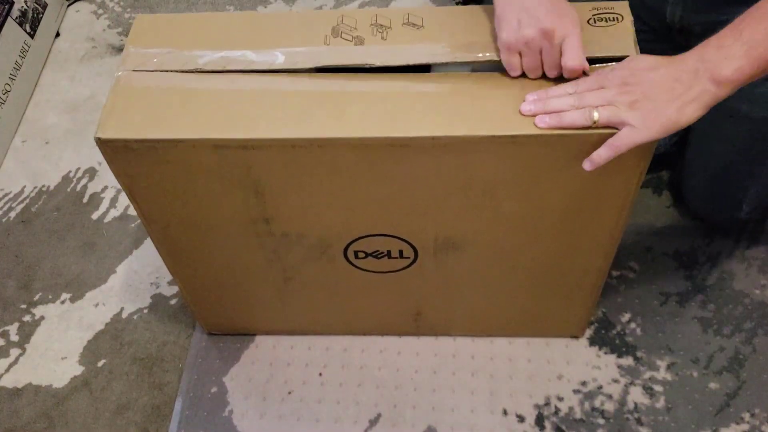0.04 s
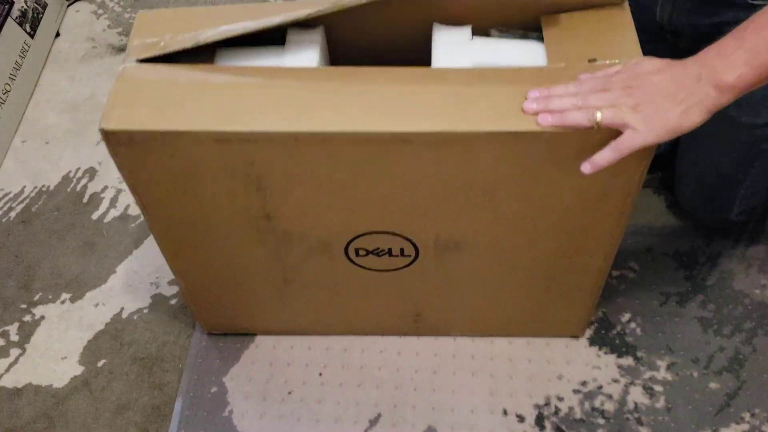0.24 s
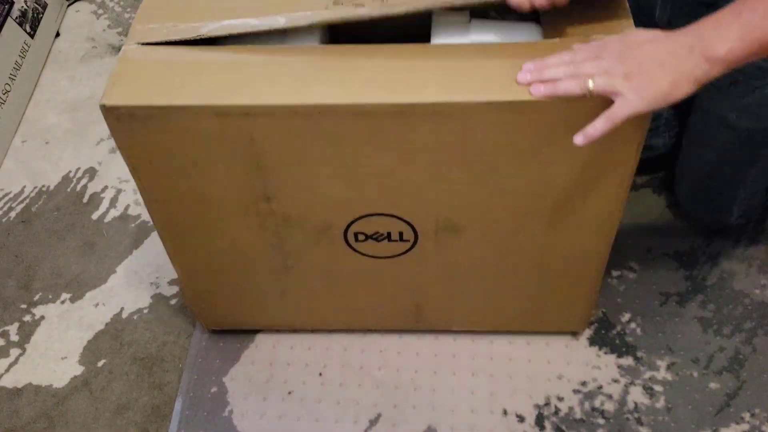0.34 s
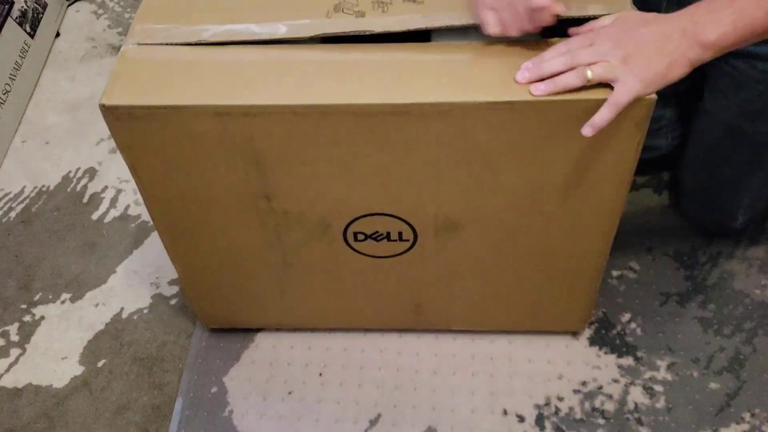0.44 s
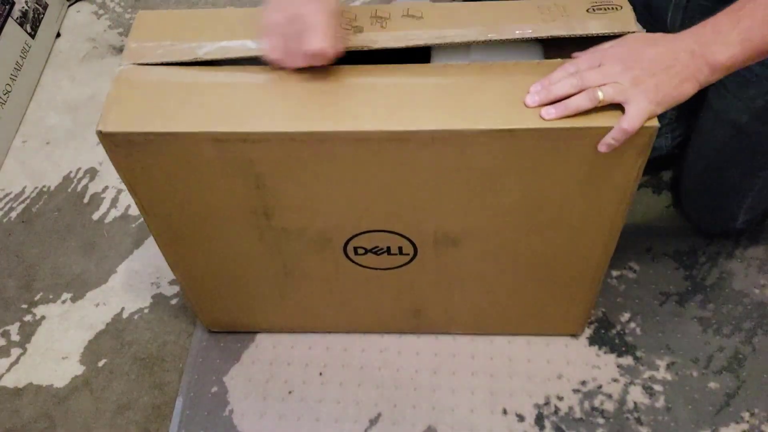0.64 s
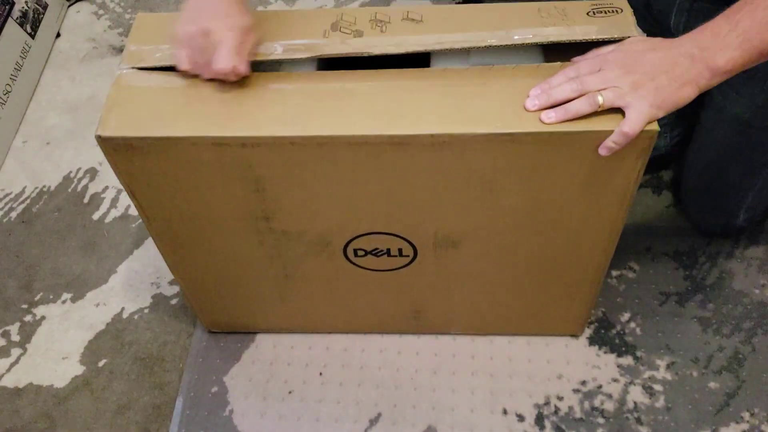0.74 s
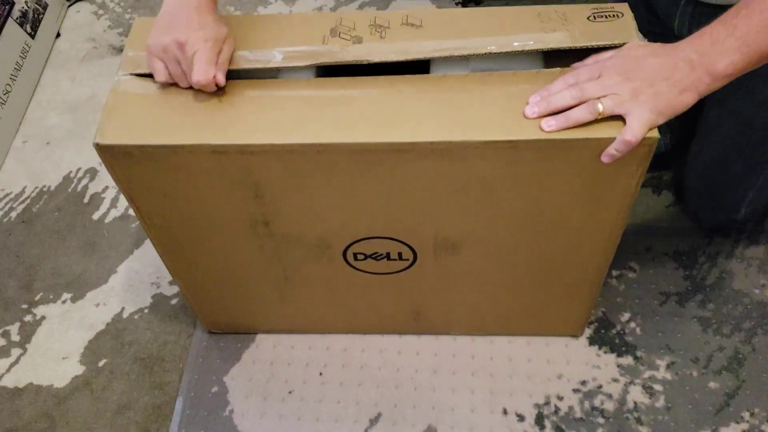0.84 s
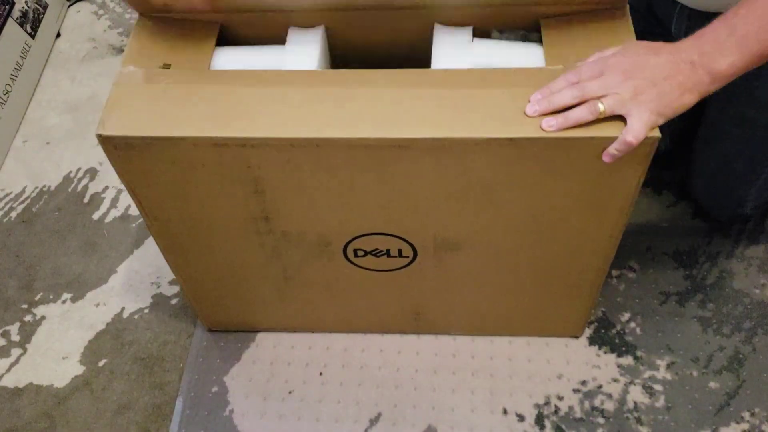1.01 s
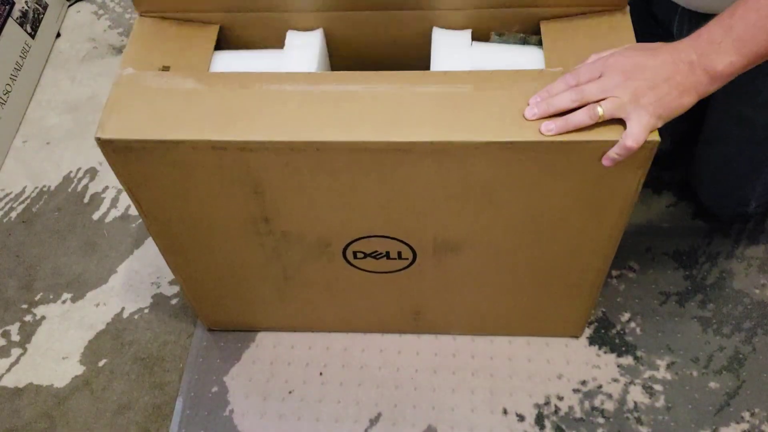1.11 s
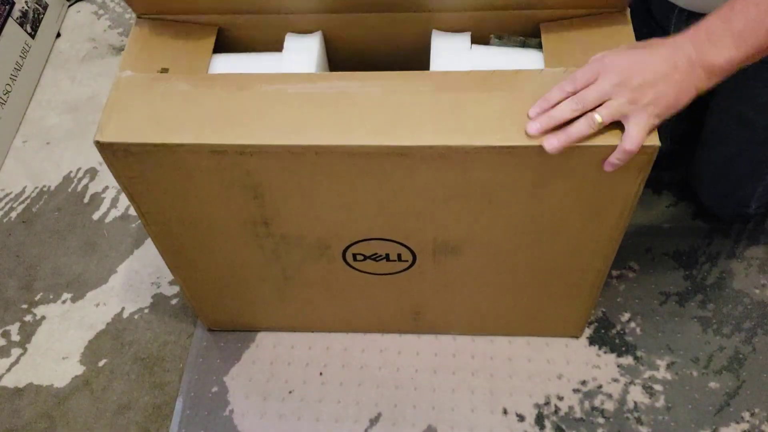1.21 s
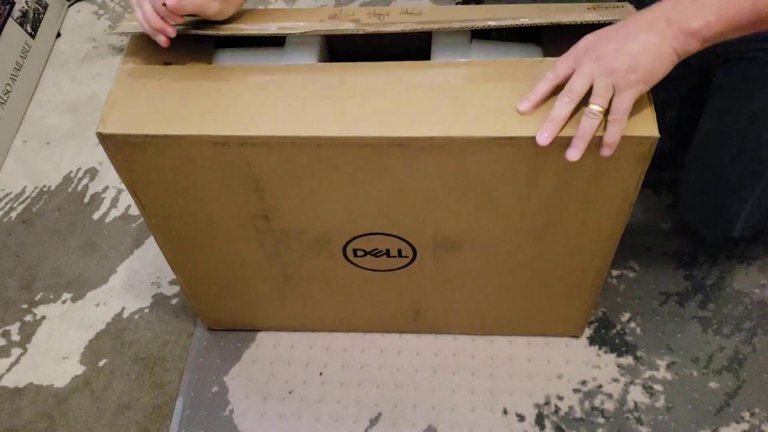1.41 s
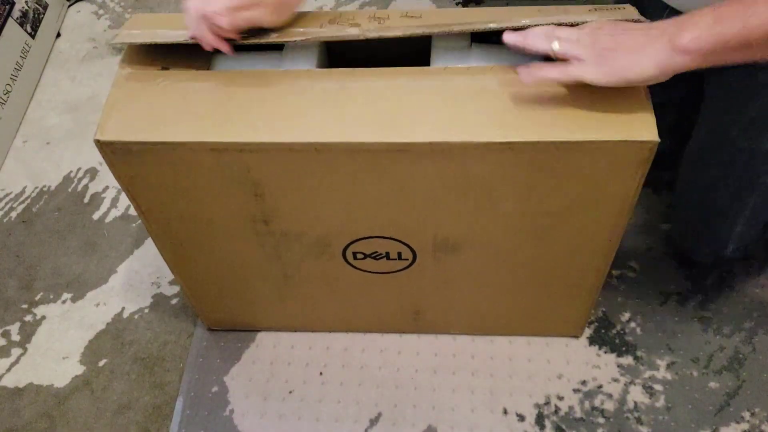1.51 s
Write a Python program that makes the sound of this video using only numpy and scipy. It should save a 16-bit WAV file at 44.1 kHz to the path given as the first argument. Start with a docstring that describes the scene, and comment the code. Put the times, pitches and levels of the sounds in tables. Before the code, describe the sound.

Cardboard box flap ripped open in two tugs, with hollow thumps and scraping.

```python
"""The taped flap of a big cardboard box is tugged open in a hard-walled room.
First a hand slides and bumps on the card while the flap scrapes, squeaks at its fold and ticks.
A tug rasps, then one end rips free with a pop; the flap knocks and the hollow box booms.
The palm drags over the box. Near one second a second tug rasps and creaks, and the other end rips free.
Last, the loose flap rattles, scrapes and creaks once more."""
import sys
import numpy as np
from scipy import signal
from scipy.fft import rfft, irfft
from scipy.io import wavfile

SR = 44100
rng = np.random.default_rng(int(sys.argv[2]) if len(sys.argv) > 2 else 0)


def wav_record(signal):
    """Record a signal, one row per channel, as 16-bit PCM in the file named by sys.argv[1]."""
    frames = np.transpose(np.atleast_2d(signal))
    bounded = np.clip(frames, -1, 1)
    # unit amplitude maps onto the largest positive 16-bit level
    quanta = np.round(bounded * 32767).astype(np.int16)
    wavfile.write(sys.argv[1], SR, quanta)


N = 68355
WIDE_HZ = 823  # above this pitch the two ears hear clearly different sound


def undb(db):
    """Turn decibels into a number to multiply by."""
    return 10 ** (np.asarray(db) / 20)


def unit(x):
    """Scale a sound to an average power of 1."""
    return x / np.sqrt(np.mean(x ** 2) + 1e-18)


def since(start):
    """Seconds since start, zero before it."""
    return np.maximum(np.arange(N) / SR - start, 0)


def fade(start, decay_s):
    """Start suddenly, then die away."""
    return (since(start) > 0) * np.exp(-since(start) / decay_s)


def convolve(x, response):
    """Pass a sound through one echo pattern per channel."""
    return signal.fftconvolve(np.atleast_2d(x), np.atleast_2d(response), axes=-1)[:, :N]


def colour(x, points, size=4096):
    """Shape the bass and treble along a curve of (f/Hz, level/dB) points."""
    hz, db = np.array(points).T
    gain = undb(np.interp(np.log(np.fft.rfftfreq(size, 1 / SR) + 1), np.log(hz), db))
    cepstrum = irfft(np.log(unit(gain)))
    cepstrum[1:size // 2] *= 2  # folded so that the filter never rings ahead of the sound
    cepstrum[size // 2 + 1:] = 0
    return convolve(x, irfft(np.exp(rfft(cepstrum))))


def resonate(x, hz, width_hz):
    """Keep the part of a sound near one pitch."""
    return signal.lfilter(*signal.iirpeak(hz, hz / width_hz, fs=SR), x)


def grains(per_s, spread_db, hiss):
    """Tiny fibre snaps of uneven size over a smooth hiss."""
    snaps = (rng.random(N) < per_s / SR) * rng.choice([-1, 1], N)
    sizes = undb(spread_db * np.clip(rng.standard_normal(N), -2, 2))
    return unit(unit(snaps * sizes) + hiss * rng.standard_normal(N))


def stroke(start, length, rise_s=0.00053, release_s=0.022):
    """The force of one rub rises, holds and lets go."""
    return (1 - np.exp(-since(start) / rise_s)) * np.exp(-since(start + length) / release_s)


def rubs(table, points):
    """Surfaces stick and slip in short, grainy bursts."""
    force = sum(undb(db) * stroke(start, length) for start, length, db in table)
    return colour(force * grains(per_s=2200, spread_db=-2, hiss=0.87), points)


def ring(start, rise_s, hz, ring_s, flutter_db=1, flutter_s=0.0181):
    """One note of the box swells, then fades by 60 dB in ring_s; loose panels make it waver."""
    t = since(start)
    phase = 2 * np.pi * rng.random()
    ear_shift = np.array([[1], [-1]]) * rng.choice([-1, 1]) * np.arctan(hz / WIDE_HZ) / 2
    steps = rng.standard_normal(size=128)
    flutter = undb(flutter_db * np.interp(t / flutter_s, np.arange(len(steps)), steps))
    loudness = flutter * (1 - np.exp(-t / rise_s)) * np.exp(-np.log(1000) * t / ring_s)
    return loudness * np.sin(2 * np.pi * hz * t + phase + ear_shift)


# tone of the quiet room: f/Hz, level/dB
BACKGROUND_TONE = [(30, -20.5), (90, 3), (180, -7.5), (500, -12), (2000, -7), (7000, -28), (15500, -38)]
def background(level_db=-72.5):
    """A faint, steady hush, different in each ear."""
    return undb(level_db) * colour(rng.standard_normal((2, N)), BACKGROUND_TONE)


# how loud the sliding hand is over time: t/s, level/dB
SLIDE_LEVELS = [(0, -47), (0.051, -41.5), (.15, -57.5), (0.357, -50), (0.375, -37), (.43, -43.5),
                (.51, -47), (.58, -44), (0.739, -44.5), (.83, -50), (.93, -59.5), (1.23, -56), (1.29, -52),
                (1.34, -54), (1.39, -53), (1.471, -56), (1.55, -42.5)]
# tone of skin on card: f/Hz, level/dB
SLIDE_TONE = [(100, -15), (300, -4.5), (700, -7.5), (1200, -17), (3000, -14), (3800, -14), (7500, -11),
              (9000, -13.5), (12500, -13.5), (15500, -21.5)]
def slide():
    """Skin brushes along the card with a fine-grained hiss."""
    force = undb(np.interp(since(0), *np.array(SLIDE_LEVELS).T))
    return colour(force * grains(per_s=2500, spread_db=2, hiss=0.58), SLIDE_TONE)


# scrapes of the flap: t/s, length/s, level/dB
FLAP_SCRAPES = [(0, 0.034, -42.5), (.025, 0.093, -50.5), (.405, 0.0083, -47), (1.262, 0.028, -46),
                (1.365, 0.039, -48.5), (1.512, 0.045, -41.5)]
# tone of a scrape: f/Hz, level/dB
SCRAPE_TONE = [(35, -102), (60, -45.5), (159, 4.5), (613, 8), (1020, -6.5), (1520, -1), (2360, -9.5),
               (4120, -32), (6120, -56.5), (7370, -2), (8280, -67), (12900, -34), (15500, -75.5)]
def scrapes():
    """The loose flap sticks and slips as it moves."""
    return rubs(FLAP_SCRAPES, SCRAPE_TONE)


# soft bumps of hand and flap: t/s, rise/s, level/dB, f/Hz around which the box rings most
SOFT_BUMPS = [(0, 0.0024, -32.5, 221), (0.033, 0.017, -28.5, 178), (0.386, 0.0084, -38.5, 130),
              (0.497, 0.0086, -36, 156), (.53, 0.015, -35, 377), (0.561, 0.016, -27, 187),
              (0.69, 0.065, -30, 131), (0.724, 0.0038, -44.5, 363), (1.011, 0.01, -36, 200),
              (1.293, 0.033, -31.5, 230), (1.375, 0.0033, -36.5, 212), (1.396, 0.0051, -31, 116),
              (1.509, 0.0047, -36.5, 162)]
def bumps(count=8, spread_octaves=0.5, ring_share=0.62):
    """Soft touches stir the lowest notes of the box (see boom) while the hand cuts them short."""
    out, notes_hz = 0, np.array(BOX_NOTES)[:count, 0]
    for start, rise_s, db, centre_hz in SOFT_BUMPS:
        share = 1 / (1 + (np.log2(notes_hz / centre_hz) / spread_octaves) ** 2)
        for gain, (hz, ring_s, *_) in zip(share / np.linalg.norm(share), BOX_NOTES):
            out = out + undb(db) * gain * ring(start, rise_s, hz, ring_s * ring_share)
    return out


# moments when the fold gives: t/s, level/dB
FOLD_SQUEAKS = [(0.0137, -33.5), (0.0246, -37.5)]
# notes of the fold: f/Hz, ring time/s, level/dB
FOLD_NOTES = [(1360, .04, -2), (1630, 0.071, -2), (1756, 0.03, 1.5)]
def folds(rise_s=0.001):
    """The fold of the flap gives twice as it is lifted, with a short squeaky ring."""
    return sum(undb(db + note_db) * ring(start, rise_s, hz, ring_s)
               for start, db in FOLD_SQUEAKS for hz, ring_s, note_db in FOLD_NOTES)


# little snaps: t/s, level/dB, f/Hz, fade time/s
CREASE_TICKS = [(0.026, -35, 4860, 0.0016), (0.1882, -28.5, 13200, 0.0014), (0.193, -29, 10800, .002),
                (0.232, -18.5, 7800, 0.0022), (0.2334, -14, 1290, 0.0015), (0.418, -36, 1730, 0.0019),
                (0.468, -37, 6400, 0.0024), (0.9821, -36.5, 6270, 0.0037), (1.0005, -24.5, 5820, 0.0017),
                (1.06, -20.5, 12200, 0.0012), (1.0605, -19.5, 6560, 0.0012), (1.0605, -14, 2090, 0.0011),
                (1.068, -23, 12000, 0.0012), (1.377, -37.5, 7200, 0.0022), (1.42, -42.5, 6000, .0015)]
def ticks(width_share=0.45):
    """Single creases snap in the card and the tape, each a tiny burst of noise around one pitch."""
    out = 0
    for start, db, hz, decay_s in CREASE_TICKS:
        force = fade(start, decay_s)
        burst = force * rng.standard_normal(N)
        snap = resonate(resonate(burst, hz, hz * width_share), hz, hz * width_share)
        out = out + undb(db) * unit(snap) * np.sqrt(np.mean(force ** 2))
    return out


# rasps of the two tugs: t/s, length/s, level/dB
TUG_RASPS = [(.188, 0.0055, -32), (.2, 0.1, -45), (.984, 0.0028, -42.5), (.998, 0.0079, -43.5),
             (1.010, 0.013, -34.5), (1.04, 0.017, -42.5)]
# tone of a rasp: f/Hz, level/dB
RASP_TONE = [(35, -28), (60, -11), (167, 2), (585, -2.5), (1480, -17), (1960, -11), (2150, -22),
             (3270, -13.5), (3580, -13), (6710, -14), (8870, -16.5), (11200, -14), (15500, -29.5)]
def rasps():
    """Tape and card stick and slip under the strain of a tug."""
    return rubs(TUG_RASPS, RASP_TONE)


# the two rips: t/s, crack level/dB, crackle level/dB, crackle fade time/s, slap level/dB, boom level/dB
FLAP_RIPS = [(0.2332, 2, 3.5, 0.041, 1, -8.5), (1.0603, -1.5, 2, 0.042, -6, -15.5)]
# tone of the tearing, one list per rip: f/Hz, level/dB
RIP_TONES = [
    [(40, -35), (90, -17), (170, -2.5), (330, -3.5), (450, -11), (560, -4.5), (740, -6.5), (1050, -12),
     (1450, -31), (2200, -29), (3800, -23.5), (5500, -32.5), (7500, -20.5), (9200, -38), (12000, -31),
     (15500, -40.5)],
    [(40, -37), (90, -30), (140, -2.5), (330, -4), (500, -0.5), (800, -1.5), (910, -22.5), (1100, -8),
     (1600, -9.5), (1900, -20), (2250, -14.5), (2900, -23), (6000, -20.5), (9200, -27.5), (12000, -29),
     (15500, -37)],
]
CRACK_DB, CRACKLE_DB, SLAP_DB = -11.5, -18.5, -14  # added to each rip's own levels
def rips(rise_s=0.00059, crack_s=0.0024, slap_lag_s=0.0071, slap_s=0.0017, slap_top_hz=1420):
    """The flap tears free: a crack, a fast dying crackle of fibres and a dull slap as it whips."""
    out = 0
    for (start, crack_db, crackle_db, decay_s, slap_db, _), tone in zip(FLAP_RIPS, RIP_TONES):
        crack = undb(CRACK_DB + crack_db) * fade(start, crack_s)
        crackle = undb(CRACKLE_DB + crackle_db) * fade(start, decay_s)
        force = (crack + crackle) * (1 - np.exp(-since(start) / rise_s))
        tear = force * grains(per_s=2800, spread_db=9.5, hiss=0.55)
        slap = undb(SLAP_DB + slap_db) * fade(start + slap_lag_s, slap_s) * rng.standard_normal(N)
        dull_slap = signal.lfilter(*signal.butter(2, slap_top_hz, fs=SR), slap)
        out = out + colour(tear + dull_slap, tone)
    return out


# blows of the flap: t/s, level/dB, f/Hz
FLAP_KNOCKS = [(0.2359, -11, 191), (.2715, -14, 325), (1.0715, -13.5, 640), (1.182, -26.5, 594),
               (1.22, -36.5, 506), (1.241, -37.5, 470), (1.265, -38.5, 974), (1.29, -37.5, 516)]
def knocks(rise_cycles=0.9):
    """The freed flap slams and rattles against the box; each blow dies within a few swings."""
    out = 0
    for start, db, hz in FLAP_KNOCKS:
        cycles = since(start) * hz
        swell = cycles / rise_cycles * np.exp(1 - cycles / rise_cycles)
        out = out + undb(db) * swell * np.sin(2 * np.pi * cycles)
    return out


# natural notes of the box: f/Hz, ring time/s, level/dB in the first rip, level/dB in the second
BOX_NOTES = [(64, 0.35, -36, -21), (132.3, 0.31, -17, 2), (191, 0.32, -0.5, -5), (244.3, 0.12, -35, -2.5),
             (310, 0.39, -9, -14), (342.6, 0.28, -5, -10.5), (410.7, 0.32, -23, -11.5),
             (528.4, 0.26, -11, -6), (665, 0.38, -14.5, -16), (810, 0.13, -24, 2),
             (1094.5, 0.19, -22, -2.5), (1226, 0.11, -13, -13), (2224, 0.18, -53, -12.5)]
def boom(lag_s=0.003162, rise_s=0.0094):
    """Each rip sets the panels and the air in the box swinging at their natural notes."""
    return sum(undb(boom_db + note_db[k]) * ring(start + lag_s, rise_s, hz, ring_s)
               for k, (start, *_, boom_db) in enumerate(FLAP_RIPS) for hz, ring_s, *note_db in BOX_NOTES)


# drags of the palm: t/s, length/s, level/dB
PALM_DRAGS = [(.54, 0.052, -46.5), (.71, 0.011, -48)]
# tone of a drag: f/Hz, level/dB
DRAG_TONE = [(100, -41), (300, -10), (600, -5.5), (900, -8), (1400, -40), (5000, -24)]
def drags():
    """The palm sticks and slips over the box with a dull rub."""
    return rubs(PALM_DRAGS, DRAG_TONE)


# creaks of card on card: t/s, length/s, level/dB, slip rate/Hz
CARD_CREAKS = [(1, 0.011, -43, 180), (1.509, 0.021, -41, 150)]
# pitches at which the flap rings: f/Hz, width/Hz, level/dB
FLAP_NOTES = [(458, 29, -1), (593, 39, 1.5), (756, 28, -1.5), (1340, 40, -16), (2022, 29, 4),
              (4130, 3000, -36)]
def creaks(count=40, jitter=0.012, swell_s=0.0062):
    """Card catches and slips at a nearly even rate, ringing the flap."""
    out = 0
    for start, length, db, rate in CARD_CREAKS:
        times = start + np.cumsum(1 + jitter * rng.standard_normal(count)) / rate - 1 / rate
        sizes = undb(2 * rng.standard_normal(count))
        slips = np.bincount((times * SR).astype(int), sizes, N)[:N]
        force = stroke(start, length) * (1 - np.exp(-since(start) / swell_s))
        sound = sum(undb(note_db) * resonate(slips * force, hz, width) for hz, width, note_db in FLAP_NOTES)
        out = out + undb(db) * unit(sound) * np.sqrt(np.mean(force ** 2))
    return out


# how long the room takes to fade by 60 dB: f/Hz, ring time/s
ROOM_RING = [(100, 0.42), (500, 0.36), (2000, 0.47), (6000, 0.32), (14000, 0.11)]
def room(x, wet_db, gap_s=0.0011, early_db=8.5, early_s=0.0022, side_db=3, dry_bass_hz=302):
    """The hard walls add a fading wash of echoes, wider in the treble than in the bass."""
    x = np.ravel(x)
    hz, ring_s = np.array(ROOM_RING).T
    f = np.fft.rfftfreq(N, 1 / SR)
    mid, side = (np.exp(2j * np.pi * rng.random(len(f))) for _ in range(2))
    wide = undb(side_db) * f / np.hypot(f, WIDE_HZ)
    ears = (mid + np.array([[1], [-1]]) * wide * side) / np.sqrt(1 + wide ** 2)
    edges = np.geomspace(400, 17000, 23) - 310
    tail = 0
    for lo, hi in zip(edges, edges[1:]):  # each band of pitches stores energy and lets it leak away
        centre = (lo + hi) / 2
        decay_s = np.interp(np.log(centre), np.log(hz), ring_s) / np.log(1000)
        leak = (fade(gap_s, decay_s) + undb(early_db) * fade(gap_s, early_s)) ** 2
        band = signal.sosfilt(signal.butter(2, [lo, hi], "band", fs=SR, output="sos"), x)
        energy = np.abs(convolve(band ** 2, leak[:N // 2] / leak.sum()))
        noise = unit(irfft(ears * ((f >= lo) & (f < hi)), N))
        bass_cut = centre / np.hypot(centre, dry_bass_hz)  # the bass arrives mostly direct
        tail = tail + np.sqrt(energy) * noise * bass_cut
    return (x + undb(wet_db) * tail) / np.sqrt(1 + undb(2 * wet_db))


def reflect(x, count=14, spread_s=0.014, low_hz=700, echo_db=-5):
    """Floor and box sides send a few early echoes of the treble, different ones to each ear."""
    size = int(spread_s * SR)
    echoes = np.array([np.bincount(rng.integers(1, size, count), rng.choice([-1., 1.], count), 2 * size)
                       for _ in range(2)])
    echoes = signal.lfilter(*signal.butter(2, low_hz, "high", fs=SR), echoes) / np.sqrt(count)
    return x + undb(echo_db) * convolve(x, echoes)


def scene():
    """All the handling of the box, in a quiet room."""
    handling = rasps() + scrapes() + drags() + slide() + ticks()
    hush = background()
    echoing = reflect(room(rips(), wet_db=4.5) + room(handling, wet_db=3.5) + creaks() + knocks())
    return echoing + folds() + boom() + bumps() + hush


def record(dry, dip_share=0.56, top_hz=15700):
    """The microphone has a dip in the high treble; the recorder cuts the top."""
    dipped = dry - dip_share * resonate(dry, hz=9230, width_hz=5900)
    return signal.sosfilt(signal.ellip(8, .2, 70, top_hz, fs=SR, output="sos"), dipped)


dry = scene()
out = record(dry)
wav_record(out)
```